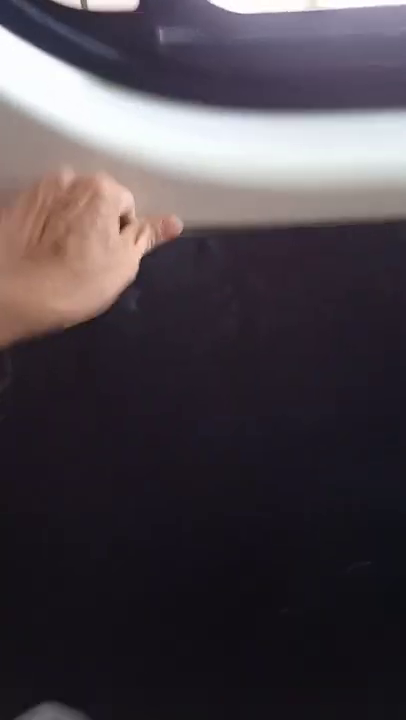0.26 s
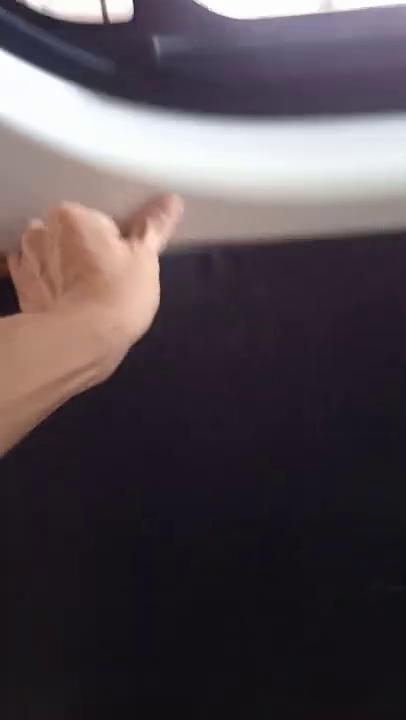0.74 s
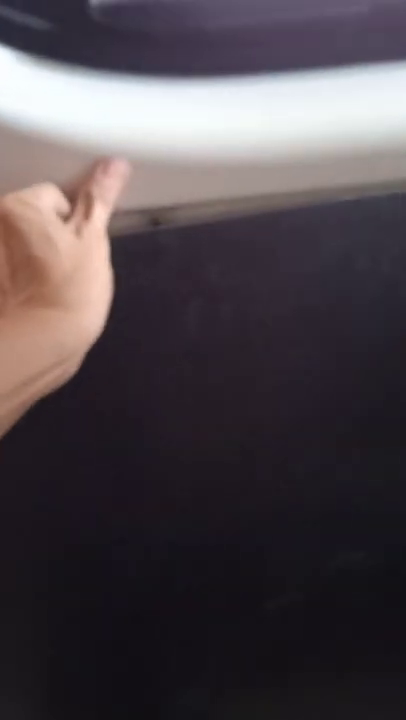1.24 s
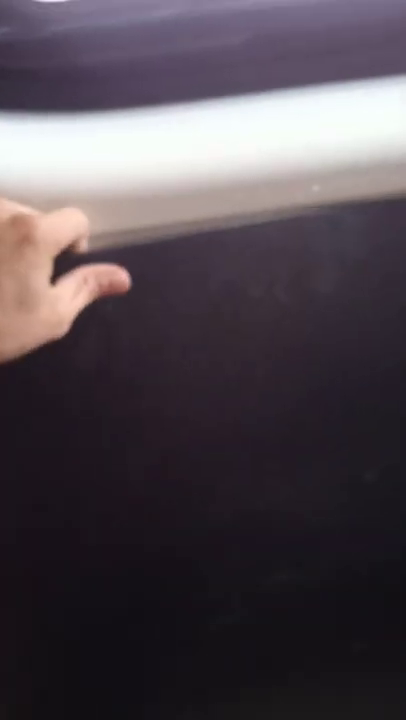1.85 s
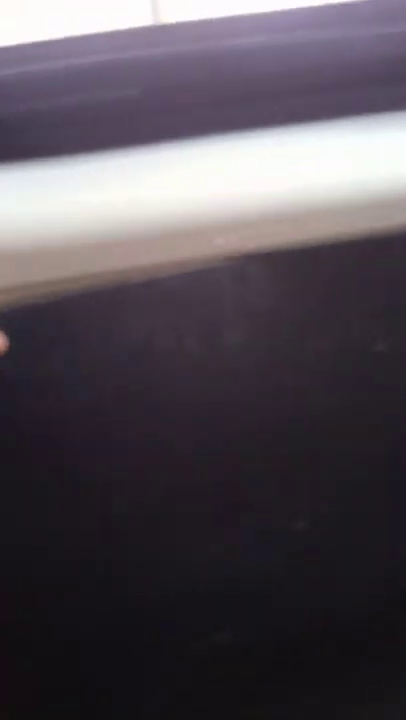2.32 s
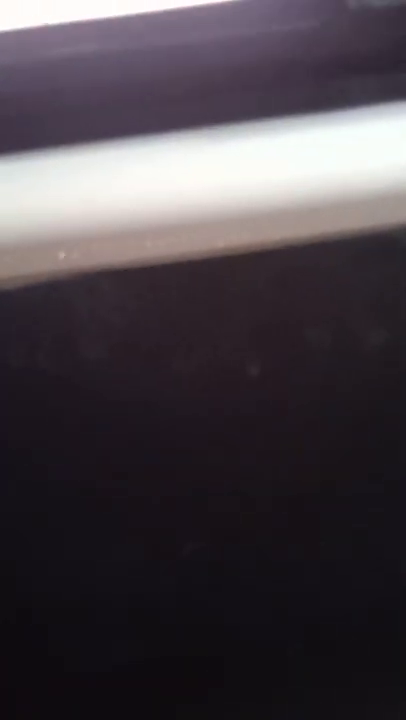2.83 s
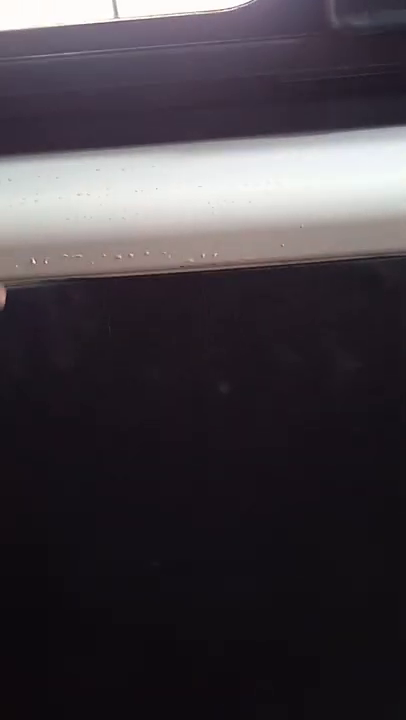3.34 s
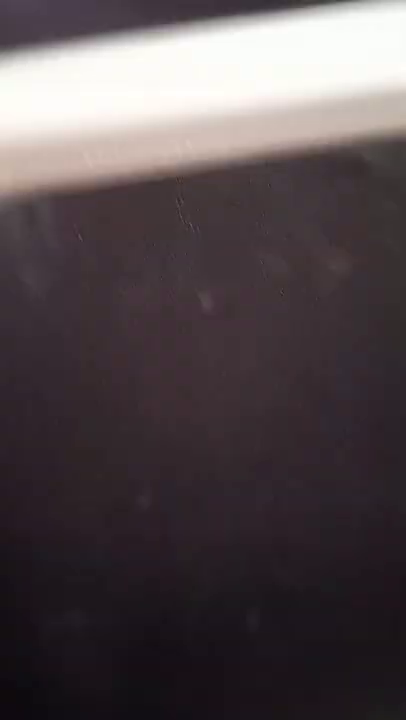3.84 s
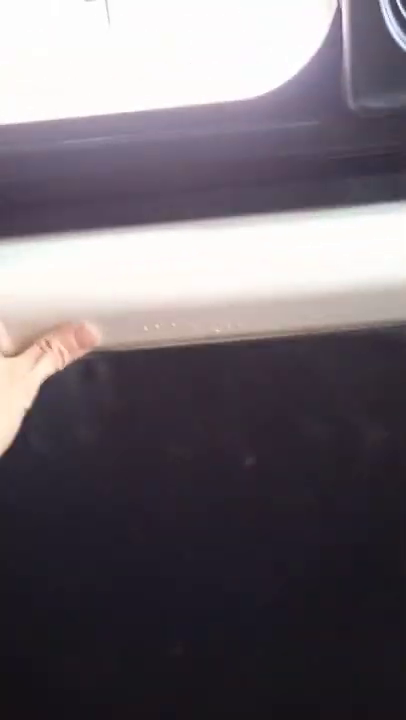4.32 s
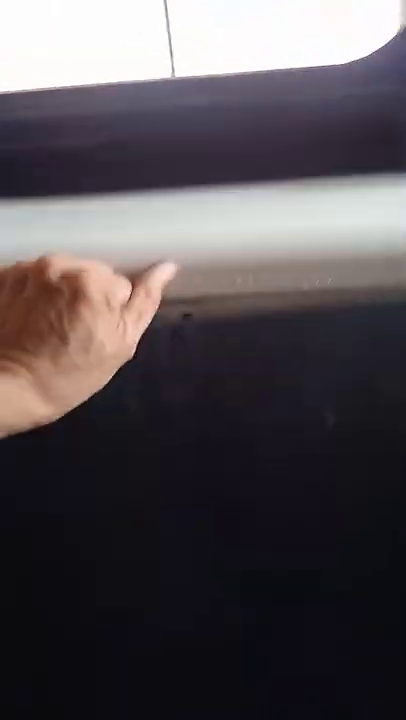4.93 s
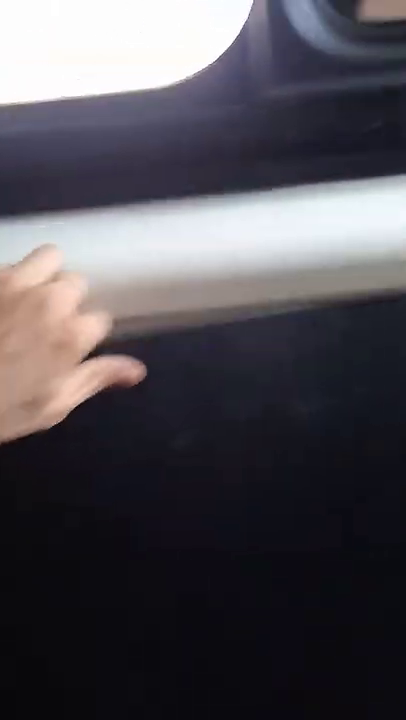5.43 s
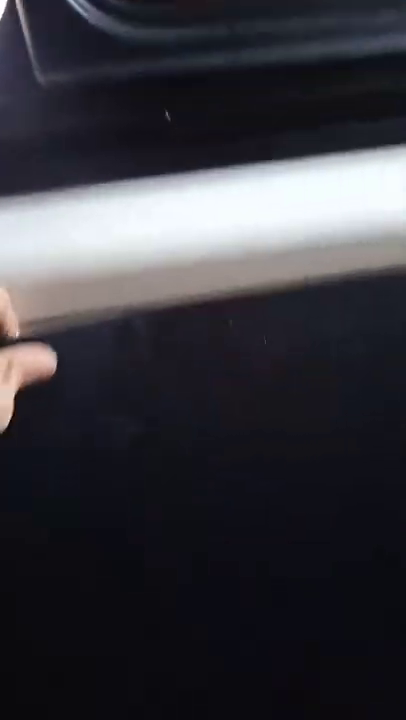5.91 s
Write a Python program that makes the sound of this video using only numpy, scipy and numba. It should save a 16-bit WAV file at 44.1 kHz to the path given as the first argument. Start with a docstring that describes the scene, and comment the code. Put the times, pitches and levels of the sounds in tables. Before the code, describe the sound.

Handheld phone in a small, resonant van interior with faint outdoor rumble and thin hiss. Fading buzz and rattling taps lead to a hard latch clunk. After a quiet gap with small bumps, rollers grind and drone for about a second. Soft friction and short squeaks follow, then another heavy clunk with quick rebounds, ending in light knocks and rubs.

```python
"""The latch of a van's sliding door clunks twice, heard from inside: struck panel modes, clatter and a ping.
Between the clunks the door rumbles along its rail, as random roller contacts filtered at a pitch set by speed.
Small knocks and rebounds are light blows on the same panel modes; a push pumps the air of the cabin.
Friction by the microphone is coloured noise with hoarse squeaks; a buzz of harmonic lines opens the scene.
A low outdoor rumble and a thin hiss, both filtered noise, lie beneath."""
import sys
import numpy as np
from scipy import signal
from scipy.fft import rfft, irfft, next_fast_len
from scipy.io import wavfile
from scipy.ndimage import uniform_filter1d
from numba import njit

SR = 44100
rng = np.random.default_rng(int(sys.argv[2]) if len(sys.argv) > 2 else 0)


def generate_wav(signal):
    """Clip the signal to [-1, 1] and save it as 16-bit WAV at the path in sys.argv[1]."""
    frames = np.transpose(np.atleast_2d(signal))
    scaled = np.clip(frames, -1, 1) * 32767
    pcm = np.round(scaled).astype(np.int16)
    wavfile.write(sys.argv[1], SR, pcm)


N = 272097
TIME = np.arange(N) / SR


def undb(db):
    """Amplitude ratio of a level in dB."""
    return 10 ** (np.asarray(db) / 20)


def unit(x):
    """Normalisation to an rms of 1."""
    return x / np.sqrt(np.mean(x ** 2))


def curves(table):
    """Linear interpolation in time of each column of a table."""
    s, *columns = np.transpose(table)
    return [np.interp(TIME, s, c) for c in columns]


def at_hz(table, hz):
    """Linear interpolation of a table on a log-frequency axis."""
    f, value = np.transpose(table)
    return np.interp(np.log(np.maximum(hz, 1)), np.log(f), value)


def colour(x, spectrum, tilt_db=0):
    """Spectral shaping: x filtered by a spectrum, tilted in dB per octave above 1 kHz, to rms 1."""
    size = next_fast_len(len(x))
    hz = np.maximum(np.fft.rfftfreq(size, 1 / SR), 1)
    db = at_hz(spectrum, hz) + tilt_db * np.log2(np.maximum(hz / 1000, 1))
    lowest_hz, highest_hz = spectrum[0][0], spectrum[-1][0]
    # roll-off beyond both ends of the spectrum
    ends = 1 / (1 + (hz / highest_hz / 2) ** 4) / (1 + (lowest_hz / hz / 2) ** 2)
    return unit(irfft(rfft(x, size) * undb(db) * ends, size)[:len(x)])


def noise(spectrum):
    """Stationary Gaussian noise of a given spectrum."""
    return colour(rng.standard_normal(N), spectrum)


def walk(rate):
    """Random fluctuation of rms 1: held values, `rate` a second, smoothed twice."""
    k = max(int(SR / rate), 1)
    held = np.repeat(rng.standard_normal(N // k + 1), k)
    return unit(uniform_filter1d(uniform_filter1d(held, k), k)[:N])


def add(out, s, x):
    """Superposition: x is mixed into out from time s."""
    i = max(int(s * SR), 0)
    out[i:i + len(x)] += x[:N - i]


def fade(t60):
    """Exponential decay over one second, falling 60 dB in t60 seconds."""
    return undb(-60 * TIME[:SR] / t60)


@njit
def resonate(x, hz, width):
    """Resonance of a two-state band-pass filter with a moving centre and a fixed width in Hz."""
    y, band, low = np.empty(len(x)), 0., 0.
    for i in range(len(x)):
        g, damping = np.tan(np.pi * hz[i] / SR), width / hz[i]
        v = (band + g * (x[i] - low)) / (1 + g * (g + damping))
        band, low, y[i] = 2 * v - band, low + 2 * g * v, damping * v
    return y


# Background levels. Each row: time in seconds, low rumble in dB, hiss in dB.
AIR_LEVELS = [(0, -54.5, -63), (1.6, -61.5, -65.5), (3.5, -61, -66), (4.3, -65.5, -70.5),
              (5.5, -66.5, -74.5), (6.17, -67, -65.5)]
# Spectra of the low rumble and the hiss. Each row: frequency in Hz, relative level in dB per Hz.
AIR_LOW_SPECTRUM = [(25, -31.5), (45, -7.5), (75, 5.5), (140, 9), (220, -2.5), (400, 0), (600, -19.5),
                    (1200, -60.5)]
AIR_HISS_SPECTRUM = [(400, 12), (850, 5.5), (1700, 3.5), (2300, -3.5), (3600, -8.5), (6000, -8),
                     (7500, -13.5), (10000, -22), (13500, -30.5), (15300, -17.5)]


def background():
    """Transmission: a low outdoor rumble passes through the van's body, under a thin broadband hiss."""
    low_db, hiss_db = curves(AIR_LEVELS)
    low = noise(AIR_LOW_SPECTRUM) * undb(low_db + 0.66 * walk(17))
    hiss = noise(AIR_HISS_SPECTRUM) * undb(hiss_db + 0.17 * walk(15))
    return low + hiss


# Harmonic lines of the buzz. Each row: multiple of the pulse rate, relative level in dB.
BUZZ_HARMONICS = [(2, -17), (3, 2.5), (5, -13), (7, 0.5), (9, -12), (10, -21.5), (14, -21.5)]
BUZZ_HZ = 49.35  # mean pulse rate
BUZZ_DB, BUZZ_FALL_DB_PER_S = -43, 23.5
BUZZ_ATTACK_S, BUZZ_END_S, BUZZ_RELEASE_S = 0.037, 0.86, 0.27


def buzz(sizzle_hz=1600.0, sizzle_width_hz=1000.0, sizzle_db=-65):
    """Periodic pulsation: unsteady harmonics of one rate die away, with a faint sizzle pulsing at that rate."""
    swell = 1 - np.exp(-TIME / BUZZ_ATTACK_S) / 2  # from half amplitude
    release = np.clip((BUZZ_END_S - TIME) / BUZZ_RELEASE_S, 0, 1)
    gain = undb(BUZZ_DB - BUZZ_FALL_DB_PER_S * TIME) * swell * release
    phase = 2 * np.pi * np.cumsum(BUZZ_HZ * (1 + 0.0036 * walk(25))) / SR
    lines = np.zeros(N)
    for k, line_db in BUZZ_HARMONICS:
        lines += undb(line_db + walk(11.8)) * np.sin(round(k) * phase + rng.uniform(0, 2 * np.pi))
    centre = np.full(N, sizzle_hz)
    sizzle = resonate(rng.standard_normal(N), centre, sizzle_width_hz)
    sizzle = unit(resonate(sizzle, centre, sizzle_width_hz))
    sizzle *= (1 + 0.11 * np.cos(phase)) * np.interp(TIME, [.6, 1.15], [1, 0])
    return gain * unit(lines) + undb(sizzle_db) * sizzle


# Modes of door panel and cabin. Each row: frequency in Hz, 60 dB decay time in seconds,
# relative level at the first clunk in dB, relative level at the second clunk in dB.
DOOR_MODES = [(118.5, 0.57, -29.5, -33), (147.5, 0.35, -32, -34.5), (172.6, 0.49, -27, -30),
              (237.9, 0.45, -25, -29), (269.5, 0.35, -30, -24), (301, 0.28, -22.5, -23),
              (336, 0.41, -22, -17), (366, 0.37, -20, -35.5), (409, 0.41, -28, -33.5),
              (440, 0.32, -30, -19), (479, 0.17, -31.5, -17.5), (581, 0.44, -26.5, -39),
              (664, 0.29, -39.5, -35), (737, 0.22, -35, -26.5), (814, 0.2, -26.5, -30),
              (857, .27, -30.5, -27.5), (888, 0.29, -37, -29), (1070, 0.24, -40, -37.5),
              (1152, .3, -40, -33.5), (1290, 0.24, -29.5, -34), (1334, 0.23, -26, -49.5),
              (1475, 0.62, -32, -50.5), (1695, 0.29, -34.5, -48)]


def panel(mode_db):
    """Modal superposition: all modes of the door set ringing at once, each with its own decay."""
    hz, t60 = np.transpose(DOOR_MODES)[:2]
    phases = rng.uniform(0, 2 * np.pi, len(hz))
    ring = np.zeros(SR)
    for f, decay, db, phase in zip(hz, t60, mode_db, phases):
        ring += undb(db) * fade(decay) * np.sin(2 * np.pi * f * TIME[:SR] + phase)
    return ring


def mode_cloud(spacing_hz, diffuse):
    """Modal density: one second of undamped modes at random pitches, over a diffuse share of noise."""
    bins = rng.standard_normal(SR // 2 + 1) + 1j * rng.standard_normal(SR // 2 + 1)
    is_mode = rng.random(len(bins)) < 1 / spacing_hz
    low = np.arange(len(bins)) < 900  # bins are 1 Hz apart; below 900 Hz the noise is plain
    return irfft(bins * np.where(low, 1, diffuse + is_mode * np.sqrt(spacing_hz * 0.47)), SR)


# Spectra of a knock's rattle and tick. Each row: frequency in Hz, relative level in dB per Hz.
RATTLE_SPECTRUM = [(250, -25), (520, -1.5), (950, -3), (1550, 6), (1900, 2.5), (2200, -5), (2900, -7.5),
                   (4200, -15.5), (7000, -42)]
TICK_SPECTRUM = [(1500, -27.5), (3500, -4.5), (5500, 2), (7300, -3.5), (9000, -16.5), (13000, -19.5),
                 (15500, -17.5)]


def knock(rattle_db, thud_db, tick_db):
    """Light impact: a dry tick, a brief rattle of loose parts and a soft thud of the panel."""
    t, modes = TIME[:SR], np.array(DOOR_MODES)
    # a soft touch spares the high modes
    soft_db = modes[:, 2:].mean(axis=1) - 7 * np.maximum(np.log2(modes[:, 0] / 500), 0)
    # loose parts chatter for a moment before they settle
    chatter = np.minimum(.8, 1.3 * fade(0.21)) * (1 - np.exp(-t / 0.0014))
    rattle = colour(mode_cloud(60, diffuse=0.53), RATTLE_SPECTRUM) * chatter
    thud = panel(soft_db) * fade(0.73) * (1 - np.exp(-t / 0.01))
    thud *= 0.086 / np.std(thud)
    tick = colour(rng.standard_normal(SR), TICK_SPECTRUM) * (0.86 * fade(0.025) + .55 * fade(0.31))
    return undb(rattle_db) * rattle + undb(thud_db) * thud + undb(tick_db) * tick


SETTLE_RATTLE_DB, SETTLE_THUD_DB, SETTLE_TICK_DB = -69.5, -55.5, -78.5  # gains


def settling(count=9):
    """Random relaxation: the trim settles in faint knocks, one at a random moment of each equal interval."""
    out = np.zeros(N)
    for s in (np.arange(count) + rng.random(count)) / count * TIME[-1]:
        add(out, s, knock(SETTLE_RATTLE_DB, SETTLE_THUD_DB, SETTLE_TICK_DB))
    return out


# Knocks of handle, rollers and trim.
# Each row: start in seconds, rattle gain in dB, thud gain in dB, tick gain in dB.
KNOCK_EVENTS = [(0.026, -53, -40, -67), (0.240, -43.5, -37.5, -63), (0.597, -52.5, -42, -73),
                (0.642, -63, -43.5, -76), (0.743, -54.5, -41.5, -71), (0.807, -50, -39.5, -68),
                (0.824, -51, -56, -67), (1.852, -54, -53, -78), (2.025, -63, -52, -67),
                (2.309, -61.5, -68, -67), (2.668, -65, -28.5, -69), (2.926, -49, -39, -76),
                (3.562, -64, -47, -67), (3.651, -51, -48.5, -62.5), (4.505, -67.5, -60, -67),
                (5.088, -50.5, -46.5, -76), (5.174, -47.5, -41, -65), (5.304, -71, -51, -81),
                (5.719, -62, -50.5, -70.5), (5.881, -58, -52, -65.5)]


def knocks():
    """Repeated impact: the hand works the handle; rollers and trim bump."""
    out = np.zeros(N)
    for s, rattle_db, thud_db, tick_db in KNOCK_EVENTS:
        add(out, s, knock(rattle_db, thud_db, tick_db))
    return out


# Friction strokes near the microphone. Each row: start in seconds, nominal length in seconds,
# gain in dB, tilt above 1 kHz in dB per octave.
RUB_STROKES = [(0.988, 0.052, -67.5, -3), (3.084, 0.25, -73.5, -1.5), (3.776, 0.13, -61.5, -4),
               (3.967, 0.064, -66, -3.5), (4.598, 0.13, -70, -24.5), (5.423, 0.078, -69.5, -2.5),
               (5.528, 0.061, -71.5, -6), (5.988, 0.14, -68, -3.5)]
# Spectrum of the friction. Each row: frequency in Hz, relative level in dB per Hz.
RUB_SPECTRUM = [(500, -13.5), (1000, -2.5), (1700, 5.5), (2400, -1), (5000, -0.5), (7200, 6.5),
                (9000, -6.5), (13000, -8), (15500, -5)]


def rubbing():
    """Sliding friction: short strokes of noise whose level flutters."""
    out, t = np.zeros(N), TIME[:SR]
    for s, length, db, tilt_db in RUB_STROKES:
        # the release starts 10 ms before the nominal end and takes 45 ms
        stroke = np.clip(t / 0.0059, 0, 1) * np.clip(1 + (length - .01 - t) / 0.045, 0, 1)
        flutter = undb(db + 2 * walk(300)[:SR])
        add(out, s, flutter * stroke * colour(rng.standard_normal(SR), RUB_SPECTRUM, tilt_db))
    return out


# Squeaks of the rub. Each row: start in seconds, length in seconds, starting pitch in Hz,
# glide in octaves per second, gain in dB.
SQUEAK_EVENTS = [(3.776, 0.1, 878, .5, -52.5), (3.855, 0.15, 1148, 0, -66), (3.956, 0.1, 794, 0.029, -60.5)]


def squeaks(waver_hz=80, overtone_db=-7.5, hoarse=0.98):
    """Friction-driven tone: the rub catches in harmonics made hoarse by random level and phase."""
    out, t = np.zeros(N), TIME[:SR]
    for s, length, hz, glide, db in SQUEAK_EVENTS:
        phase = 2 * np.pi * np.cumsum(hz * 2 ** (glide * t)) / SR
        squeak = np.zeros(SR)
        for k in range(1, 7):
            # each harmonic wavers on its own; overtone_db is the slope per octave
            level = undb(overtone_db * np.log2(k) + 3.1 * walk(waver_hz)[:SR])
            jitter = hoarse * np.sqrt(k) * walk(waver_hz * 2)[:SR]
            squeak += level * np.sin(k * phase + jitter)
        add(out, s, undb(db) * unit(squeak) * np.sin(np.pi * np.minimum(t / length, 1)) ** 2)
    return out


# Pushes of the swaying door on the cabin air. Each row: start in seconds, gain in dB.
SWAY_EVENTS = [(2.25, -61), (3.365, -42.5), (3.491, -49.5), (5.02, -46)]


def sways(cabin_hz=66):
    """Cavity resonance: the door sways on its rail and pumps the cabin's lowest air mode in short bursts."""
    out, t = np.zeros(N), TIME[:SR]
    push = np.sin(np.pi * np.minimum(t / 0.083, 1)) ** 2
    for s, db in SWAY_EVENTS:
        add(out, s, undb(db) * np.sin(2 * np.pi * cabin_hz * t) * push * 0.98)
    return out


SLIDE_START_S, SLIDE_FASTEST_S, SLIDE_STOP_S = 2.296, 2.805, 3.402
BREAKAWAY_SPEED, SLIDE_EDGE_S = .16, 0.018  # share of top speed; time to start and to settle


def door_speed():
    """Uniform acceleration as a share of top speed: a steady push, then steady friction to a stop."""
    times = [SLIDE_START_S - SLIDE_EDGE_S, SLIDE_START_S, SLIDE_FASTEST_S,
             SLIDE_STOP_S, SLIDE_STOP_S + SLIDE_EDGE_S]
    return np.interp(TIME, times, [0, BREAKAWAY_SPEED, 1, BREAKAWAY_SPEED / 2, 0])


# Spectra of the rolling door's rumble and grit. Each row: frequency in Hz, relative level in dB per Hz.
RUMBLE_SPECTRUM = [(25, -18), (45, -13), (90, -8), (170, 0.5), (250, -6), (340, 0), (450, -7), (540, -14.5),
                   (750, -31), (1200, -55)]
GRIT_SPECTRUM = [(400, -3.5), (720, 7), (1100, 1), (1650, -2), (2200, -12), (2700, -14), (3600, -24.5),
                 (6500, -28), (10000, -42.5), (15000, -45)]
RUMBLE_DB, GRIT_DB = -33, -49  # gains at top speed
RUMBLE_POWER, GRIT_POWER = 1.0, 0.69  # both grow as a power of speed
COAST_GRIT_DB_PER_S = -13.5  # unloaded rollers grind less
DRONE_REST_HZ, DRONE_RISE_HZ = 148.4, 119.5  # centre at rest; rise at top speed


def rolling(drone_db=-4, drone_width_hz=110.0, grit_spread_db=8, surge_db=0.8):
    """Rolling contact: random bumps of the rollers over grit excite the panel and a drone that follows speed."""
    speed = door_speed()
    hz = DRONE_REST_HZ + DRONE_RISE_HZ * speed
    contacts = (rng.random(N) < 5 * hz / SR) * rng.choice([-1, 1], N)  # more bumps a second at speed
    cabin = rng.standard_normal(SR) * fade(0.36)
    cabin[0] += 25  # the direct path
    grains = contacts * undb(grit_spread_db * np.clip(rng.standard_normal(N), -2, 2))
    grit = colour(signal.fftconvolve(grains, cabin)[:N], GRIT_SPECTRUM)
    drone = resonate(contacts, hz, drone_width_hz)
    drone = unit(resonate(drone, hz, drone_width_hz))
    body = undb(-3.0) * colour(contacts, RUMBLE_SPECTRUM) + undb(drone_db) * drone
    grit_db = GRIT_DB + COAST_GRIT_DB_PER_S * np.maximum(TIME - SLIDE_FASTEST_S, 0)
    rumble_part = undb(RUMBLE_DB) * speed ** RUMBLE_POWER * body
    grit_part = undb(grit_db) * speed ** GRIT_POWER * grit
    uneven_rail = undb(surge_db * walk(24.93))
    return uneven_rail * (rumble_part + grit_part)


REBOUND_FIRST_S, REBOUND_GAP_S = .074, .046  # first delay after a clunk; spacing
REBOUND_RATTLE_DB, REBOUND_THUD_DB, REBOUND_TICK_DB = -45.5, -33, -69.5  # gains of the first rebound
REBOUND_LOSS_DB = 4.5  # per rebound, for rattle and thud; the tick loses 1 dB


def rebounds(count=4):
    """Inelastic rebound: after each clunk the door knocks in its catch, weaker each time."""
    out = np.zeros(N)
    for s, *_ in CLUNK_EVENTS:
        for k in range(count):
            loss_db = k * REBOUND_LOSS_DB
            blow = knock(REBOUND_RATTLE_DB - loss_db, REBOUND_THUD_DB - loss_db, REBOUND_TICK_DB - k)
            add(out, s + REBOUND_FIRST_S + k * REBOUND_GAP_S, blow)
    return out


# Decay of door and cabin. Each row: frequency in Hz, 60 dB decay time in seconds.
RING_DECAY = [(60, 1), (200, 0.48), (600, 0.42), (1500, 0.27), (3000, 0.34), (6000, 0.28), (10000, 0.33),
              (15000, .2)]


def dense_ring(spectrum, tilt_db):
    """Frequency-dependent decay: countless close modes struck at once, each band dying at its own rate."""
    bins = rfft(colour(mode_cloud(25, diffuse=0.91), spectrum, tilt_db))
    place = at_hz([(hz, k) for k, (hz, _) in enumerate(RING_DECAY)], np.arange(len(bins)))
    ring = np.zeros(SR)
    for k, (_, t60) in enumerate(RING_DECAY):
        band = np.maximum(1 - abs(place - k), 0)  # overlapping triangles
        ring += irfft(bins * band, SR) * fade(t60)
    return ring


# Spectra of the latch's clatter and the steel catch's ping.
# Each row: frequency in Hz, relative level in dB per Hz.
CLATTER_SPECTRUM = [(35, -13), (70, -9), (300, 12.5), (900, -2), (1400, 1), (1900, -4.5), (2150, -11.5),
                    (2500, -7), (3600, -20), (6000, -18.5), (7800, -28), (10000, -35), (13000, -39),
                    (16000, -35.5)]
PING_SPECTRUM = [(5000, -13), (7500, -5.5), (10000, -22.5), (13400, -28), (14600, -2.5), (16000, -5.5)]
# Latch clunks. Each row: start in seconds, panel gain in dB, clatter gain in dB,
# clatter tilt above 1 kHz in dB per octave, steel ping gain in dB.
CLUNK_EVENTS = [(1.1715, -3, -19.5, 0, -35.5), (4.9228, -2, -21.5, -1.13, -48.5)]


def clunks(blow_hz=470, blow_db=-14, chatter_db=2):
    """Impact excitation: the latch snaps, the panel booms, the linkage clatters, the steel catch pings."""
    out, t = np.zeros(N), TIME[:SR]
    for (s, panel_db, clatter_db, tilt_db, ping_db), mode_db in zip(CLUNK_EVENTS, np.transpose(DOOR_MODES)[2:]):
        # a short, hard knock at the latch itself
        blow = undb(blow_db) * np.sin(2 * np.pi * blow_hz * t) * fade(0.072)
        # the heavy panel takes a moment to move
        boom = (panel(mode_db) + blow) * (1 - np.exp(-t / 0.00077))
        crack = 1 + 0.43 * fade(0.032)  # the direct sound stands above the cabin's tail
        chatter = undb(chatter_db * walk(150)[:SR])  # loose rods keep striking as they settle
        clatter = dense_ring(CLATTER_SPECTRUM, tilt_db) * crack * chatter * (1 - np.exp(-t / 0.0013))
        ping_decay = 0.99 * fade(0.069) + .5 * fade(.24)
        ping = colour(rng.standard_normal(SR), PING_SPECTRUM) * ping_decay * chatter
        add(out, s, undb(panel_db) * boom + undb(clatter_db) * clatter + undb(ping_db) * ping)
    return out


def scene():
    """Linear superposition of everything heard in the cabin, in one channel."""
    surroundings = background() + buzz()
    small_sounds = settling() + knocks() + rubbing() + squeaks()
    door = sways() + rolling() + rebounds() + clunks()
    return (surroundings + small_sounds + door)[None]


TOP_HZ = 15850


def record(dry):
    """Band limitation: the phone drops the deepest bass and cuts the top."""
    x = signal.sosfilt(signal.butter(4, 33, "high", fs=SR, output="sos"), dry)
    return signal.sosfilt(signal.ellip(10, .2, 80, TOP_HZ, fs=SR, output="sos"), x)


dry = scene()
out = record(dry)
generate_wav(out)
```